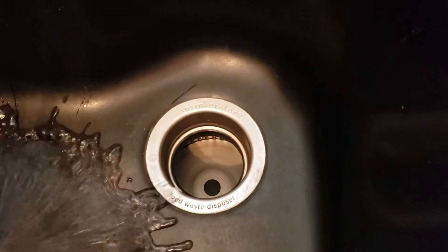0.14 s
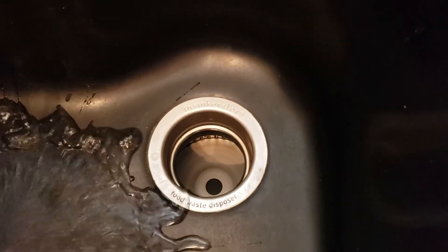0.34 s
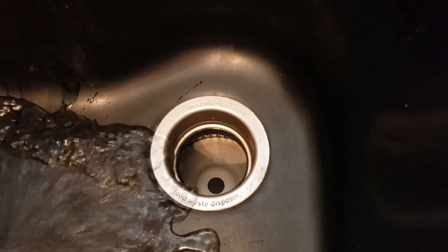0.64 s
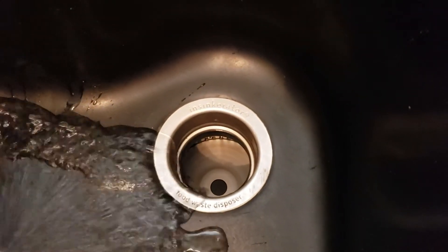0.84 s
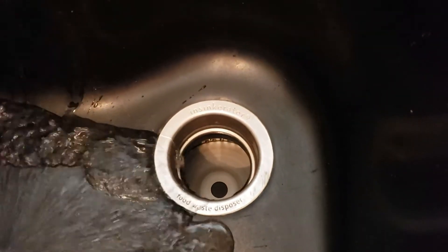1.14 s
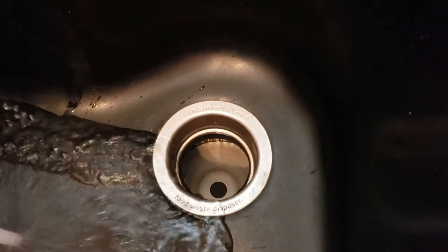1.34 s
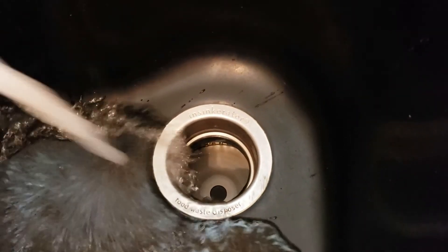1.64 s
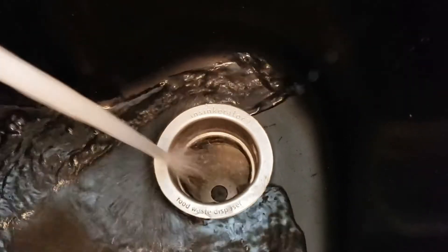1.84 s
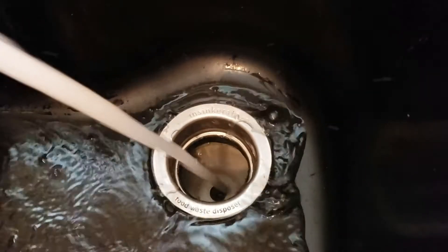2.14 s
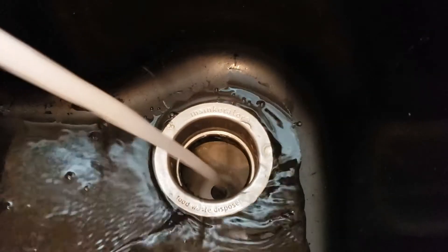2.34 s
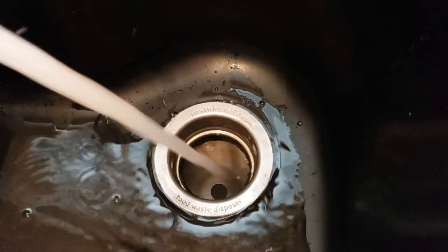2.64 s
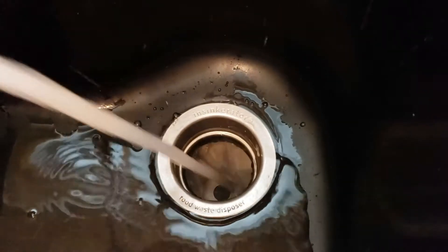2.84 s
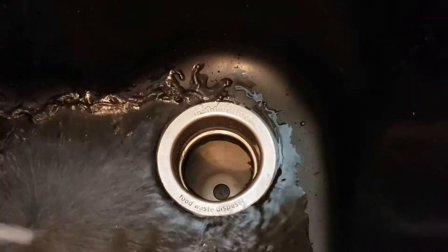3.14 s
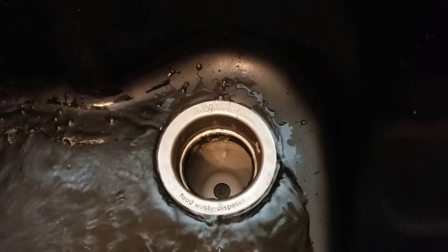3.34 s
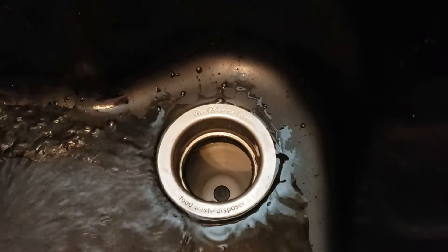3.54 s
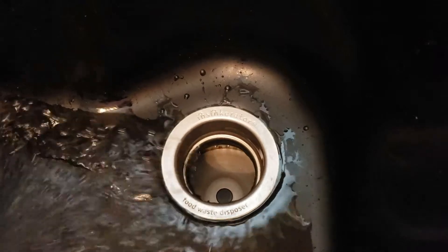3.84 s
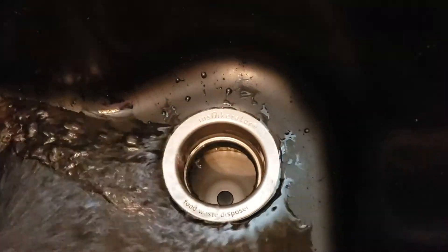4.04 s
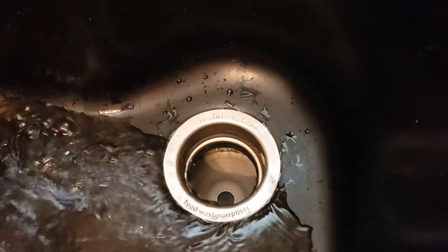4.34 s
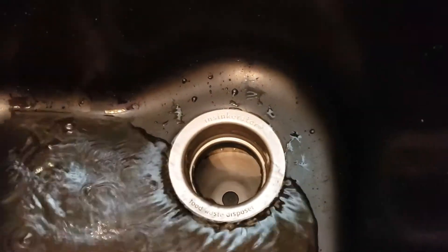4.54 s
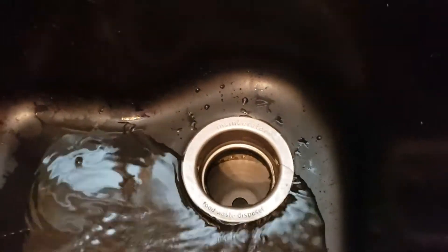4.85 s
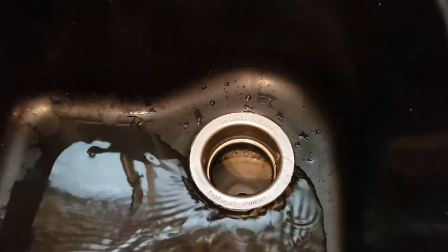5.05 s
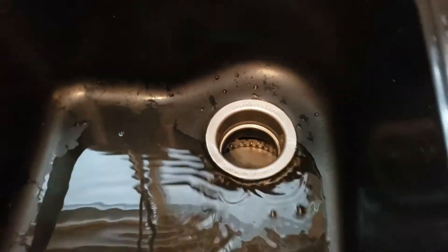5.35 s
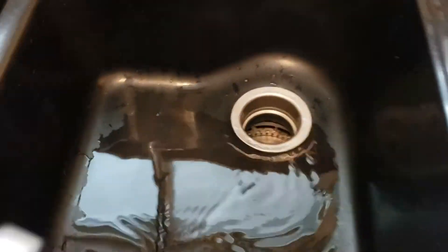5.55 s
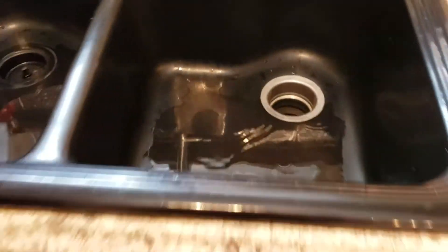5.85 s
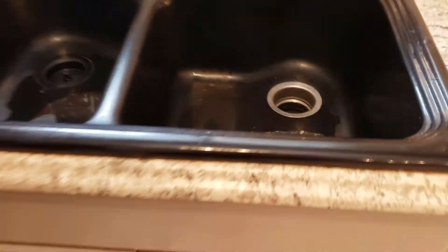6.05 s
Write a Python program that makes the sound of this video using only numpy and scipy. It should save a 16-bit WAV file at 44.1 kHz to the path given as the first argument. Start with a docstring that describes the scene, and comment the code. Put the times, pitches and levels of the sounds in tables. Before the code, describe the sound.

Close in a quiet kitchen, a tap jet hisses and splashes on a sink floor over a disposal's low hum and faint whine. The jet swings into the drain, sounding deeper and muffling the hum, then returns to gathered water with plinking bubbles and slapping drops. The motor switches off and whirs down, the tap closes, and trickles and soft glugs fade.

```python
"""Tap water hisses and drums on a sink floor over the hum and whine of a garbage disposal.
The jet swings into the drain, then back into gathered water; bubbles plink, drops slap, the drain glugs.
The motor is switched off and coasts down, the tap closes, the last water trickles away.
Water is filtered noise gated by random droplets; bubbles, glugs and thumps are decaying sines;
the motor is a mains hum, whine at multiples of the shaft speed and a low rumble."""
import sys
import numpy as np
from scipy import signal
from scipy.fft import rfft, irfft
from scipy.io import wavfile

SR = 44100
rng = np.random.default_rng(int(sys.argv[2]) if len(sys.argv) > 2 else 0)


def digitize_waveform(pressure):
    """Quantize a signal to 16-bit integers and store it at the path in sys.argv[1].

    Rows of a 2-D input are taken as channels; values are limited to [-1, 1].
    """
    field = np.atleast_2d(pressure).T
    bounded = np.clip(field, -1, 1)
    quanta = np.round(bounded * 32767).astype(np.int16)
    wavfile.write(sys.argv[1], SR, quanta)


N = 273420
T, HZ = np.arange(N) / SR, np.fft.rfftfreq(N, 1 / SR)

# force of the jet: [t/s, level/dB]
JET = [(0, -22.5), (0.3, -26.5), (0.96, -25.9), (1.06, -24), (1.5, -25), (1.82, -23), (2.05, -25),
       (2.6, -23), (3.3, -23), (4.0, -27.5), (4.88, -31)]
# landing place: [t/s, share into drain/0-1, share of the rest meeting standing water/0-1]
AIM = [(0, 0.05, 0.03), (1.65, 0.18, 0.06), (2.1, 0.69, 0.4), (3.0, 0.91, 0), (3.3, 0.79, 0.76),
       (3.9, 0.44, 0.39), (4.5, 0.04, 0.89), (6.2, 0.05, 0.97)]
# slugs of the jet: [t/s, lift/dB]
GUSHES = [(1.725, 1), (1.855, 3), (1.995, 2), (2.53, 2.5), (2.81, 0), (3.21, 1.5), (3.47, 2.5), (3.635, 4),
          (3.845, 1.5), (3.91, 0), (4.075, 1.5), (4.19, 3), (4.59, 2.5), (5.18, 3), (5.365, 3.5),
          (5.68, 4.5)]
# Laws: [floor level/dB, dry-floor extra/dB, drain extra/dB, pool extra/dB, share of gush lift/1, fade/(dB/s)]
# law of the fine hiss
SPRAY_LAW = (0.36, 0.27, 0.1, 0.39, 0.76, 19.3)
# law of the splash
SPLASH_LAW = (-6, -0.4, 3, 4, 0.92, 24.5)
# law of the drumming shell
DRUM_LAW = (-21.5, 3, 7, 3, 1.07, 19)
# law of the churning water
CHURN_LAW = (-19, -3.5, 9.5, 2, 1.34, 23.5)
# spectrum of the fine hiss: [f/Hz, relative level/dB]
SPRAY_SPECTRUM = [(4120, -16), (7000, -10.5), (8830, -10.5), (9910, -8), (11600, 2), (12700, -4.5),
                  (13800, -3), (15100, -7), (15700, -10), (16200, -47)]
# splash on bare floor: [f/Hz, relative level/dB]
SPLASH_ON_FLOOR = [(1180, -34), (2000, -6), (2050, -18), (2410, 0), (2610, -3.5), (3260, 2), (3530, 3.5),
                   (4510, 1.5), (5550, 3), (5920, 0), (6640, 1), (8000, -7), (10400, -28), (17600, -120)]
# splash in the drain: [f/Hz, relative level/dB]
SPLASH_IN_DRAIN = [(1180, -36), (2000, -12.5), (2160, -26), (2480, 1.5), (2780, -4), (3050, -0.5),
                   (3830, 0), (4180, 3), (5710, -7.5), (6380, -2), (8000, -8), (10400, -42), (17600, -120)]
# splash in standing water: [f/Hz, relative level/dB]
SPLASH_IN_POOL = [(1180, -39), (2000, -18.5), (2090, -11), (2340, 1), (2540, 1), (2880, -4), (3410, 3),
                  (3700, -6), (4060, 2), (4330, 4), (5120, -1.5), (5620, -4.5), (6920, -1.5), (8000, -8),
                  (10400, -39), (17600, -120)]
# churn on bare floor: [f/Hz, relative level/dB]
CHURN_ON_FLOOR = [(290, -33), (500, -15), (661, 0.5), (739, -13), (890, 2), (1730, 0.5), (1880, -0.5),
                  (2040, -2), (2200, -6), (2860, -22), (4840, -120)]
# churn in the drain: [f/Hz, relative level/dB]
CHURN_IN_DRAIN = [(290, -54), (500, -16), (532, -23), (573, 0.5), (657, -4), (730, -7), (884, -6),
                  (1070, -12), (1240, -6), (1270, -0.5), (1330, 2), (1430, 0.5), (1550, -2), (1700, -3.5),
                  (2200, 0), (2860, -38), (4840, -120)]
# churn in standing water: [f/Hz, relative level/dB]
CHURN_IN_POOL = [(290, -39), (500, -15), (545, -2.5), (617, -15), (661, -2.5), (762, 5), (935, -6.5),
                 (1050, -3), (1160, -16), (1340, -3.5), (1910, -8), (2090, -31), (2200, -12), (2860, -21),
                 (4840, -120)]
# drumming on bare floor: [f/Hz, relative level/dB]
DRUM_ON_FLOOR = [(88, -40), (150, -11.5), (199, -4), (258, 4), (301, -18), (359, 2.5), (414, -22.5),
                 (461, -5.5), (520, -10.5), (680, -24), (1140, -120)]
# drumming in the drain: [f/Hz, relative level/dB]
DRUM_IN_DRAIN = [(88, -35), (150, -11), (200, 8.5), (237, -4.5), (280, 7), (312, 4.5), (429, 1.5),
                 (520, -16), (680, -56), (1140, -120)]
# drumming in standing water: [f/Hz, relative level/dB]
DRUM_IN_POOL = [(88, -28), (150, -9.5), (178, -3.5), (237, -14.5), (284, 4), (339, -4), (414, -7),
                (459, -22), (499, -14), (520, -12), (680, -38), (1140, -120)]
# modes of the grinding chamber, rung by the water: [f/Hz, width/Hz, relative level/dB]
CHAMBER_MODES = [(288.7, 18, -45), (652.6, 21, -44.5), (1301, 12, -41), (1566, 60, -40), (1980, 200, -42.5),
                 (2277, 29, -38), (2450, 50, -37.5), (2640, 50, -55), (3200, 46, -41), (4420, 130, -42.5)]
# motor hum, muffled while water fills the drain: [t/s, level/dB]
HUM = [(0, -36.5), (1.55, -39.5), (1.75, -42.5), (2.3, -40.5), (2.8, -45.5), (3.08, -51), (3.9, -50),
       (4.06, -39.5), (4.38, -48)]
# rotor whine: [multiple of shaft speed/1, level/dB]
WHINE_ORDERS = [(3, -74), (4, -72), (4.5, -58), (5, -61), (6, -61), (7.5, -67.5), (8, -91), (11, -67.5),
                (15, -65), (20, -62), (23, -64), (25, -60)]
# shaking of the motor: [f/Hz, relative level/dB]
RUMBLE_SPECTRUM = [(20, -20), (40, -17), (57, -3), (85, -6.5), (130, 1.5), (170, -4.5), (260, -9.5)]
# quiet kitchen: [f/Hz, relative level/dB]
ROOM_SPECTRUM = [(20, -4), (60, -6), (140, -10), (188, 11.5), (240, -9), (310, -6), (420, -10), (800, -11),
                 (1200, -39), (4000, -28), (16000, -46)]
# larger bubbles: [t/s, level before offsets/dB, initial pitch f/Hz]
BUBBLES = [(1.207, -15, 4340), (1.3575, -18.5, 4060), (1.5468, -16, 4340), (1.725, -9, 3780),
           (1.8592, -21, 4600), (1.9704, -15, 3470), (1.9959, -13, 4600), (2.0039, -13.5, 3940),
           (2.121, -14, 4420), (2.391, -11, 3710), (2.5367, -14, 3260), (2.5674, -11.5, 4060),
           (3.1278, -14.5, 4560), (3.8417, -18, 4190), (3.896, -14.5, 4180), (4.0597, -14, 4000),
           (4.487, -13.5, 3990), (4.59, -13, 4300), (4.7007, -16.5, 3740), (4.7963, -15.5, 4470),
           (4.8733, -23, 4130), (4.9766, -19.5, 5030), (5.01, -19.5, 5120), (5.1003, -23, 4800),
           (5.1647, -30, 4500), (5.8883, -38, 4420)]
# drop bursting on deep water: [f/Hz, relative level/dB]
PLOP_SPECTRUM = [(500, -23), (1400, -3.5), (2000, -22), (2400, 4.5), (4400, 6), (5500, -4), (7500, -21),
                 (10000, -12)]
# hollow note of the basin, falling as the jet nears the drain: [t/s, f/Hz, level/dB]
HOLLOW = [(.8, 1150, -74), (1.099, 1080, -49.5), (1.499, 964, -54.5), (1.87, 791, -49), (2.05, 676, -52),
          (2.3, 630, -80)]
# single drops slapping the wet sink: [t/s, level before offset/dB]
SLAPS = [(1.02, -15), (1.117, -11), (1.24, -14), (1.695, -12), (2.09, -14), (4.105, -12), (4.168, -26),
         (4.645, -18), (4.902, -7.5), (4.923, -18), (5.01, -17), (5.582, -24), (5.889, -35)]
# drop bursting on the wet floor: [f/Hz, relative level/dB]
SLAP_SPECTRUM = [(1000, -30), (2500, -20), (4400, 0.5), (7000, 1), (9000, -5.5), (11500, 10.5),
                 (12700, 3.5), (14000, -8), (16000, -20)]
# dull thumps of the sink: [t/s, level before offset/dB, f/Hz]
THUMPS = [(1.44, -40, 56), (3.14, -32, 55.3), (4.17, -31, 66)]
# air gulped through the drain: [t/s, level/dB, factor on pipe pitch/1]
GLUGS = [(2.09, -29.5, 1.2), (2.33, -28.5, 1.18), (3.292, -38, 0.78), (3.728, -32.5, 0.96),
         (3.89, -30.5, 1.05), (4.62, -42, 1), (4.698, -36, 0.96), (4.817, -32.5, .98), (4.915, -41, 0.99),
         (5.116, -31.5, 0.99), (5.263, -27, 1)]
# modes of the air in the drain pipe: [f/Hz before pitch factor, relative level/dB, t60/s]
PIPE_MODES = [(129, -10, 0.11), (185.4, -1.5, 0.22), (209, -5, 0.084), (286, -6.5, 0.12), (360, -36, 0.073)]
# stereo balance: [f/Hz, left minus right level/dB]
LEAN = [(100, .8), (500, 1), (900, 2), (1300, 0.5), (1600, 7.5), (2050, 9), (2500, 0.5), (3800, -0.5),
        (4300, -5), (5300, -6), (6000, -19), (9000, -9), (11500, -20.5), (14000, -29), (16000, -7)]
# stereo likeness: [f/Hz, correlation/0-1]
ALIKE = [(30, .75), (60, 0.5), (160, 0.75), (270, 0.95), (450, 0.52), (740, 0.61), (1220, 0.61),
         (2000, 0.03), (2500, 0.47), (3600, 0.59), (5500, 0.12), (9000, 0)]

MOTOR_OFF_S, TAP_OFF_S = 4.37, 4.927
MAINS_HZ, SHAFT_HZ = 60.05, 59.47
WETTING_S = 0.81  # time constant of the film covering the dry floor
GUSH_WIDTH_S = 0.017  # a slug reaches zero at twice this from its centre
LULL_LEAD_S, LULL_SHARE = 0.054, 0.28  # the jet thins just before each slug
MIST_HZ, DARKENING_DB_PER_S = 9500, 4.5  # after closing, mist dies before larger droplets
BUBBLE_OFFSET_DB, BURST_OFFSET_DB, SLAP_OFFSET_DB, THUMP_OFFSET_DB = 2, -6, -5.5, -5.5
FIZZ_DB = -8  # relative to the splash
WAVER_DB = 1.5  # hum waver (rms) with all water in the drain
BAND_LIMIT_HZ = 16150


def amp(db):
    """Amplitude factor of a level in dB."""
    return 10 ** (np.asarray(db) / 20)


def evened(x):
    """Scales to rms 1."""
    return x / np.sqrt(np.mean(x ** 2) + 1e-20)


def read(points):
    """A spectrum table on the frequency grid, interpolated over log frequency."""
    hz, value = np.transpose(points)
    return np.interp(np.log(HZ + 1), np.log(hz), value)


def colour(points):
    """Gain of a spectrum table, falling steeply beyond its ends."""
    below = np.minimum((HZ + 1) / points[0][0], 1)
    above = np.minimum(points[-1][0] / (HZ + 1), 1)
    return amp(read(points)) * (below * above) ** 10


def curves(rows):
    """Each column of a time table, sample by sample."""
    s, *columns = np.transpose(rows)
    return [np.interp(T, s, column) for column in columns]


def add(mix, s, sound):
    """Adds a sound in place from a moment on, cut at the end."""
    part = mix[..., round(s * SR):][..., :sound.shape[-1]]
    part += sound[..., :part.shape[-1]]


def wander(slow_hz, fast_hz):
    """Slow random drift of rms 1, mostly between two rates."""
    spectrum = rfft(rng.standard_normal(N))
    band = HZ / (HZ + slow_hz) / (1 + (HZ / fast_hz) ** 2)
    return evened(irfft(spectrum * band, N))


def stereo(pair, gain=1):
    """Mixes two versions of a sound to left and right: alike in the bass, treble leaning right."""
    a, b = rfft(pair)
    alike, lean = read(ALIKE), amp(read(LEAN))
    left = lean * (alike * a + np.sqrt(1 - alike ** 2) * b)
    mono_level = np.sqrt(1 + lean ** 2 + 2 * alike * lean) / 2
    return irfft(np.array([left, a]) * gain / mono_level, N)


def patter(strength, gain):
    """Noise shaped by strength in time and gain in frequency, mono sum at rms 1."""
    pair = stereo(strength * rng.standard_normal((2, N)), gain)
    return pair / np.std(pair.mean(0))


def impacts(per_s, spread_db, ring_s, wash):
    """Strength of a hail of uneven droplets, their energy dying exponentially over a steady wash."""
    size = amp(spread_db * np.minimum(rng.exponential(1, N), 4.6))
    energy = size ** 2 * (rng.random(N) < per_s / SR)
    energy = signal.lfilter([1], [1, -np.exp(-1 / (ring_s * SR))], energy)
    return np.sqrt(energy / energy.mean() + wash)


def basin(x, t60_s, wet, lag=0):
    """The sink walls return a short cloud of sparse reflections, another for each channel."""
    t = T[:SR // 4]
    hits = rng.random((2, len(t))) < 1 / 10
    taps = rng.standard_normal((2, len(t))) * hits * amp(-60 * t / t60_s)
    taps *= wet / np.linalg.norm(taps, axis=1, keepdims=True)
    taps[0, 0] = taps[1, lag] = 1  # direct sound; lag in samples
    return signal.oaconvolve(np.atleast_2d(x), taps / np.hypot(1, wet), axes=1)[:, :N]


def landing(strength, floor, drain, pool):
    """Water noise whose colour follows where the jet lands, mixed by power share."""
    in_drain, in_pool = curves(AIM)
    shares = (1 - in_drain) * (1 - in_pool), in_drain, (1 - in_drain) * in_pool
    return sum(np.sqrt(share) * patter(strength, gain) for share, gain in zip(shares, (floor, drain, pool)))


def slug(s):
    """A short smooth swell of height 1 around a moment."""
    return np.maximum(1 - ((T - s) / (2 * GUSH_WIDTH_S)) ** 2, 0) ** 2


def after_tap_s():
    """Time since the tap closed, 0 before."""
    return np.maximum(T - TAP_OFF_S, 0)


def water_db(law, drain_bend=1.5):
    """Level of a water sound: jet force, landing place and gushes, fading once the tap is closed."""
    floor_db, dry_db, drain_db, pool_db, gush_share, fade_db_per_s = law
    in_drain, in_pool = curves(AIM)
    place_db = floor_db + dry_db * np.exp(-T / WETTING_S)
    place_db += drain_db * in_drain ** drain_bend + pool_db * (1 - in_drain) * in_pool
    gush_db = sum(db * (slug(s) - LULL_SHARE * slug(s - LULL_LEAD_S)) for s, db in GUSHES)
    return curves(JET)[0] + place_db + gush_share * gush_db - fade_db_per_s * after_tap_s()


def spray(surge, notch_hz=3680, notch_width_hz=130, notch_db=-14):
    """The jet bursts into droplets: a crackling splash under a fine hiss, thinning to a trickle."""
    shared = impacts(per_s=690, spread_db=1.5, ring_s=0.0022, wash=1.0)
    fine = shared * impacts(per_s=3900, spread_db=-1.0, ring_s=0.00033, wash=1.6)
    coarse = shared * impacts(per_s=400, spread_db=3.0, ring_s=0.0011, wash=2.4)

    hiss = patter(fine, colour(SPRAY_SPECTRUM)) * amp(water_db(SPRAY_LAW) + 0.28 * surge)
    mist = irfft(rfft(hiss) / (1 + (MIST_HZ / (HZ + 1)) ** 10), N)
    hiss = hiss - mist * (1 - amp(-DARKENING_DB_PER_S * after_tap_s()))

    # a wall echo cancels one band, outside the drain
    notch = amp(notch_db / (1 + ((HZ - notch_hz) / notch_width_hz) ** 2))
    floor, pool = colour(SPLASH_ON_FLOOR) * notch, colour(SPLASH_IN_POOL) * notch
    splash = landing(coarse, floor, colour(SPLASH_IN_DRAIN), pool)
    splash = splash * amp(water_db(SPLASH_LAW) + 0.79 * surge)
    return basin(hiss, t60_s=0.027, wet=0.2) + basin(splash, t60_s=0.046, wet=0.52)


def pounding(surge):
    """The jet drums on the shell, churns the water and rings the grinding chamber's resonances."""
    drum_gain = amp(water_db(DRUM_LAW, drain_bend=2.9))
    churn_gain = amp(water_db(CHURN_LAW, drain_bend=3.6))
    blows = impacts(per_s=500, spread_db=3.5, ring_s=0.0029, wash=0.78) * amp(0.61 * surge)
    drum = landing(blows, colour(DRUM_ON_FLOOR), colour(DRUM_IN_DRAIN), colour(DRUM_IN_POOL))
    churn = landing(blows, colour(CHURN_ON_FLOOR), colour(CHURN_IN_DRAIN), colour(CHURN_IN_POOL))
    ring = sum(amp(db) / np.sqrt(width) / (1 + 2j * (HZ - hz) / width) ** 2
               for hz, width, db in CHAMBER_MODES)
    in_drain = curves(AIM)[0]
    chamber = patter(blows, ring) * churn_gain * (0.28 + in_drain)
    return drum * drum_gain + churn * churn_gain + chamber


def motor(coast_s=0.8, hum_off_s=0.02):
    """Windings hum at twice the mains rate until switched off; the rotor then coasts down exponentially."""
    since_off = np.maximum(T - MOTOR_OFF_S, 0)
    hum_db = curves(HUM)[0] + WAVER_DB * curves(AIM)[0] * wander(4, 7)
    hum = amp(hum_db) * np.exp(-since_off / hum_off_s) * np.sin(2 * np.pi * 2 * MAINS_HZ * T)

    speed = np.exp(-since_off / coast_s)
    turns = np.cumsum(SHAFT_HZ * speed * (1 + 0.0013 * wander(0.65, 5.4))) / SR
    whine = sum(amp(db + 2 * wander(1, 4.8)) * np.sin(2 * np.pi * (order * turns + rng.random()))
                for order, db in WHINE_ORDERS)
    rumble = patter(1, colour(RUMBLE_SPECTRUM)) * amp(-52.0 + 2 * wander(0.9, 2.2))
    tones = np.sqrt(2) * (hum + whine * speed ** 2) * amp([[.4], [-.4]])  # left, right dB
    return tones + rumble * speed ** 2


def room():
    """The quiet kitchen: steady filtered noise."""
    return amp(-67.0) * patter(1, colour(ROOM_SPECTRUM))


def bubble(hz, cycles, rise):
    """A bubble's ring decays over a number of cycles, its pitch rising as it nears the surface."""
    turns = hz * T[:SR // 20]
    envelope = np.exp(-turns / cycles) * (1 - np.exp(-turns / 2))
    return np.sin(2 * np.pi * turns * (1 + rise * turns / cycles)) * envelope


def bubbles(burst_s=0.0049, attack_s=0.0013):
    """Small bubbles fizz under the splash; large drops burst on water and trap a bubble that plinks."""
    fizz, large, bursts = np.zeros((3, N))
    size = amp(3.6 * np.minimum(rng.exponential(1, N), 3)) * (rng.random(N) < 400 / SR)
    pitches_hz = np.geomspace(2400, 5400, num=24)
    kind = rng.integers(0, len(pitches_hz), N)
    for k, hz in enumerate(pitches_hz):
        ring = np.sqrt(hz) * bubble(hz, cycles=6.7, rise=0.011)
        fizz += signal.oaconvolve(size * (kind == k), ring)[:N]

    t = T[:SR // 20]
    burst = np.exp(-t / burst_s) * (1 - np.exp(-t / attack_s))
    for s, db, hz in BUBBLES:
        add(large, s, amp(db + BUBBLE_OFFSET_DB) * bubble(hz, cycles=7.6, rise=0.003))
        add(bursts, s, amp(db + BURST_OFFSET_DB) * burst)
    plops = stereo(bursts * rng.standard_normal((2, N)), evened(colour(PLOP_SPECTRUM)))
    rings = evened(fizz) * amp(water_db(SPLASH_LAW) + FIZZ_DB) + large
    return plops + stereo(basin(rings, t60_s=0.059, wet=0.92, lag=SR // 2000))


def hollow(width_hz=150):
    """Splashing rings the air over the sink floor: a noise band on a gliding carrier."""
    s, hz, db = np.transpose(HOLLOW)
    band = irfft(rfft(rng.standard_normal((2, N))) / (1 + (2 * HZ / width_hz) ** 2), N)
    carrier = np.cos(2 * np.pi * np.cumsum(np.interp(T, s, hz)) / SR)
    return evened(stereo(band * carrier)) * np.interp(T, s, amp(db), left=0, right=0)


def slaps(ring_s=0.0023, tail_s=0.024, tail_db=-18):
    """Big drops burst as bright noise snaps, each with a short tail in the basin."""
    strength = np.zeros(N)
    t = T[:SR // 10]
    snap = np.exp(-t / ring_s) + amp(tail_db) * np.exp(-t / tail_s)
    for s, db in SLAPS:
        add(strength, s, amp(db + SLAP_OFFSET_DB) * snap)
    return stereo(strength * rng.standard_normal((2, N)), evened(colour(SLAP_SPECTRUM)))


def drain_pipe(attack_s=0.002, thump_peak_s=0.0175):
    """The whole sink thumps now and then; gulps of air ring the modes of the drain pipe."""
    out, t = np.zeros(N), T[:SR // 2]
    for s, db, pitch in GLUGS:
        ring = sum(amp(level) * 1000 ** (-t / t60) * np.sin(2 * np.pi * hz * pitch * t)
                   for hz, level, t60 in PIPE_MODES)
        add(out, s, amp(db) * ring * (1 - np.exp(-t / attack_s)))
    out = signal.sosfilt(signal.butter(3, 110, "high", fs=SR, output="sos"), out)
    swell = t / thump_peak_s * np.exp(1 - t / thump_peak_s)
    for s, db, hz in THUMPS:
        add(out, s, amp(db + THUMP_OFFSET_DB) * swell * np.sin(2 * np.pi * hz * t))
    return out * amp([[.4], [-.4]])  # left, right dB


def scene():
    """Sums all sources; one surge of the unsteady jet swells spray and pounding together."""
    surge = wander(2.3, 10.4)
    water = spray(surge) + pounding(surge)
    return water + motor() + room() + bubbles() + hollow() + slaps() + drain_pipe()


def record(dry):
    """Linear-phase low-pass at the band limit."""
    lowpass = signal.firwin(511, BAND_LIMIT_HZ, window=("kaiser", 9), fs=SR)
    return signal.oaconvolve(dry, lowpass[None], "same")


dry = scene()
out = record(dry)
digitize_waveform(out)
```